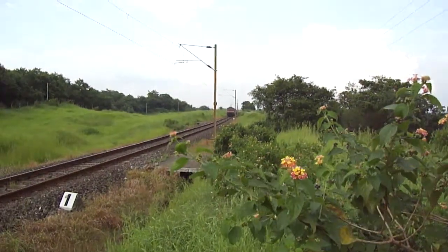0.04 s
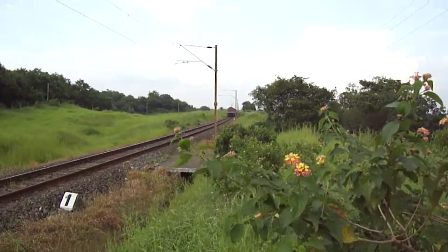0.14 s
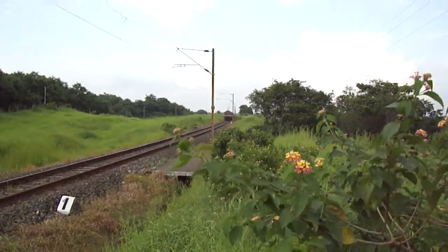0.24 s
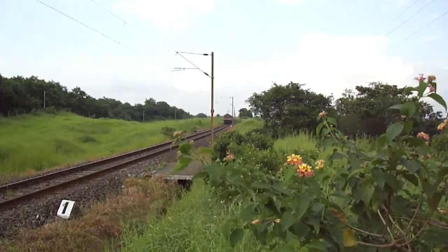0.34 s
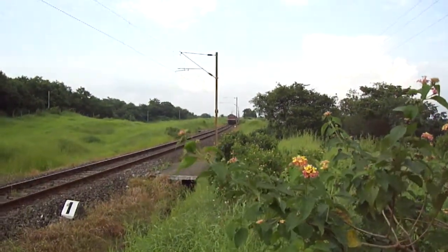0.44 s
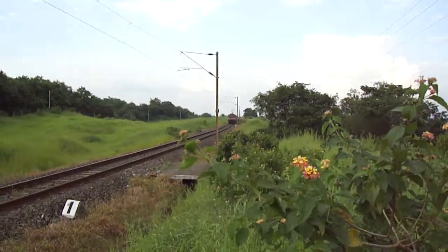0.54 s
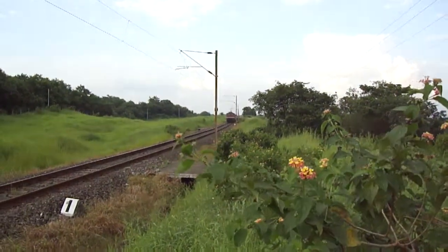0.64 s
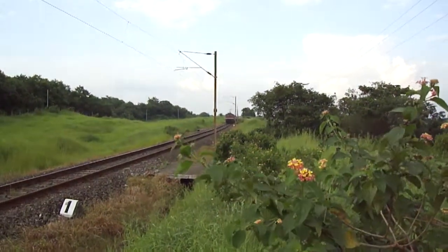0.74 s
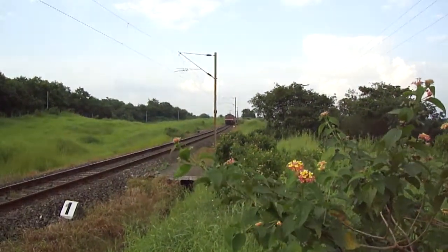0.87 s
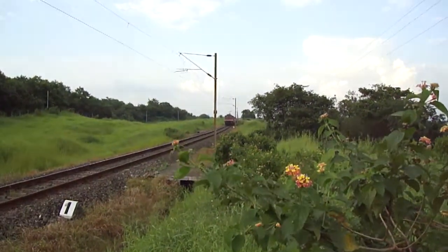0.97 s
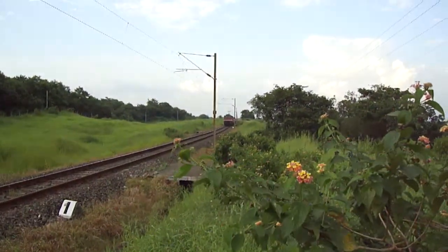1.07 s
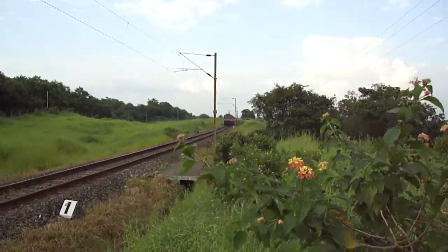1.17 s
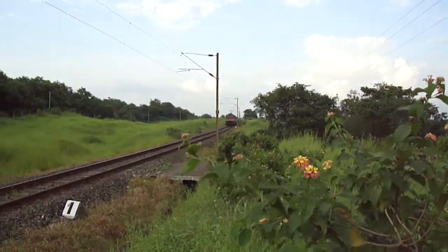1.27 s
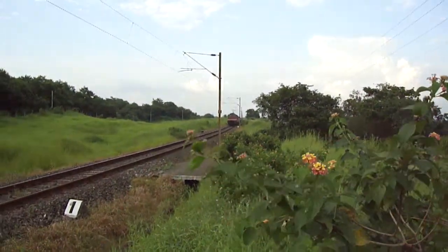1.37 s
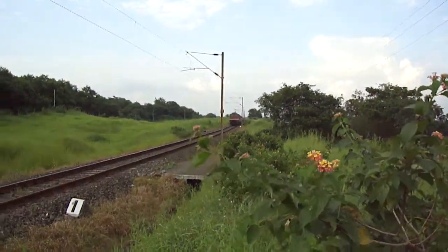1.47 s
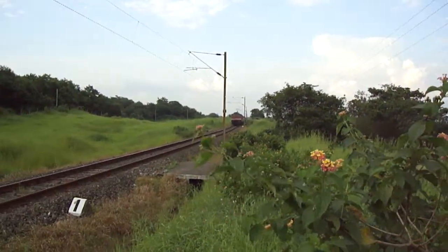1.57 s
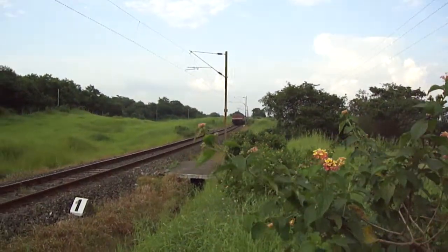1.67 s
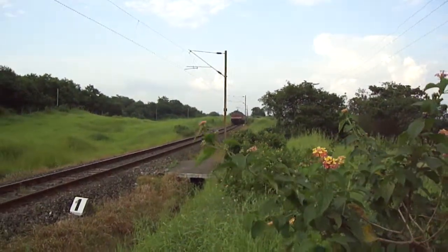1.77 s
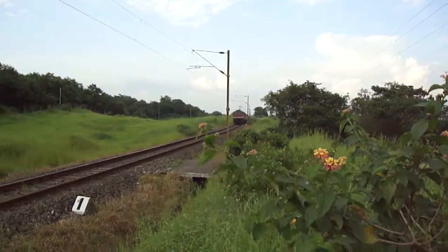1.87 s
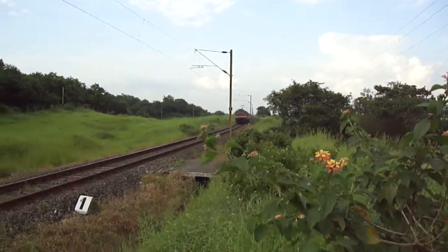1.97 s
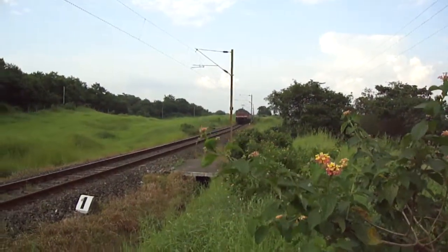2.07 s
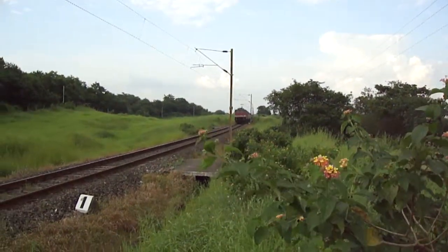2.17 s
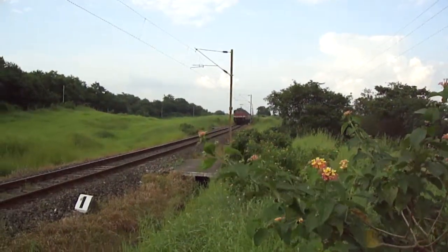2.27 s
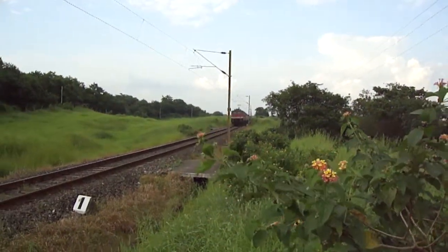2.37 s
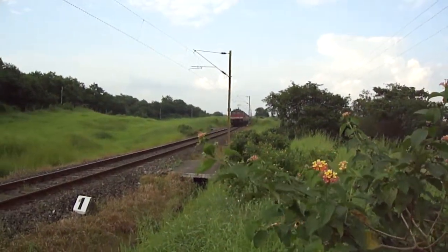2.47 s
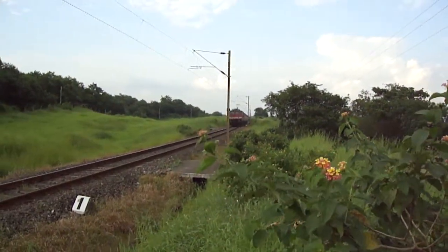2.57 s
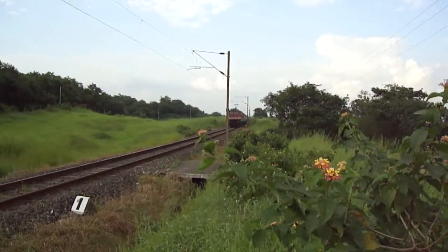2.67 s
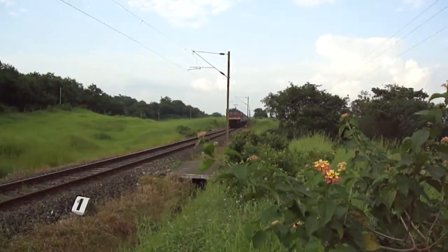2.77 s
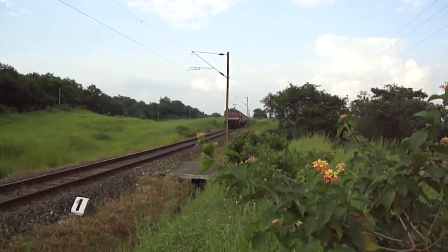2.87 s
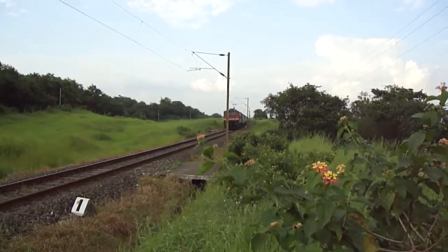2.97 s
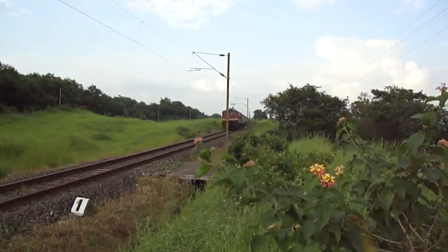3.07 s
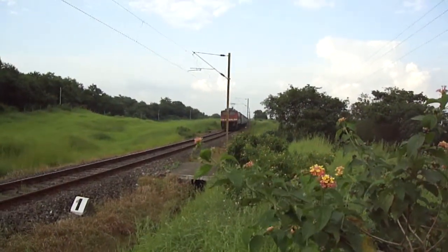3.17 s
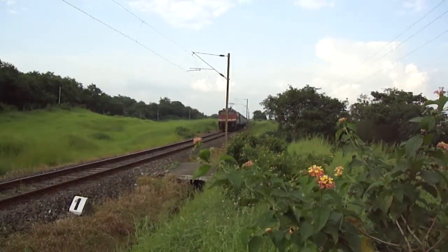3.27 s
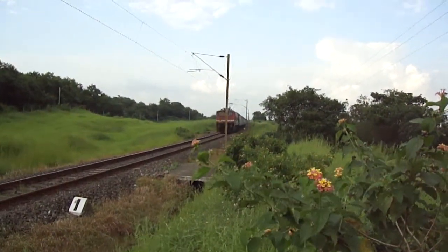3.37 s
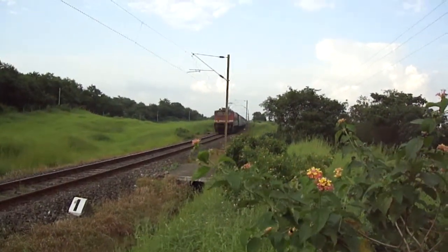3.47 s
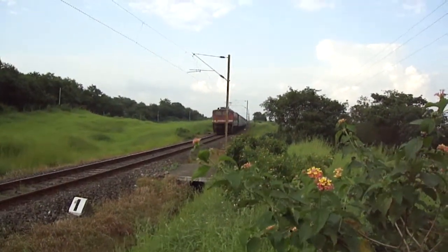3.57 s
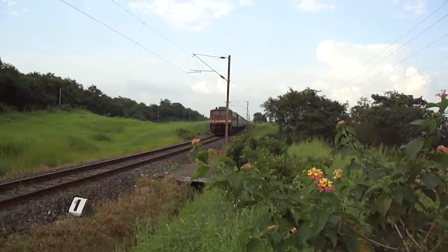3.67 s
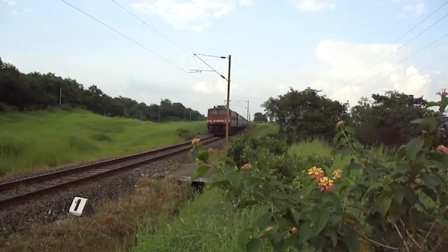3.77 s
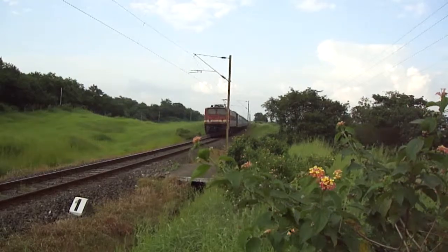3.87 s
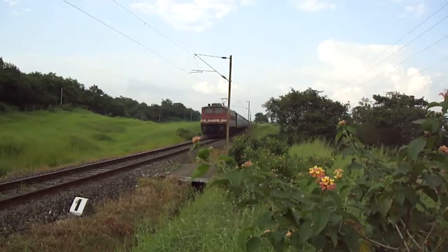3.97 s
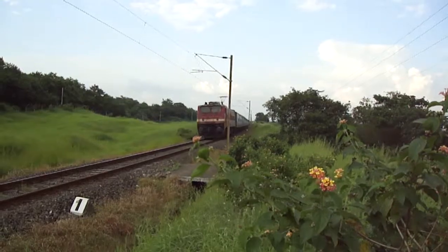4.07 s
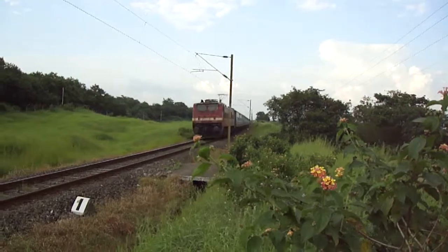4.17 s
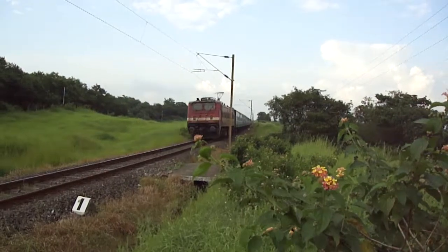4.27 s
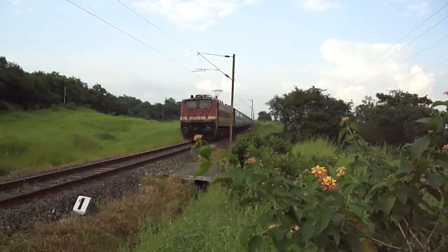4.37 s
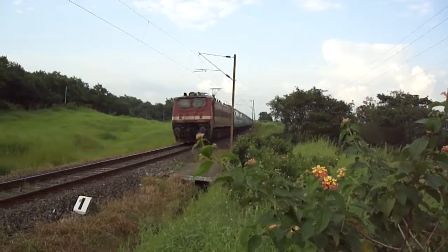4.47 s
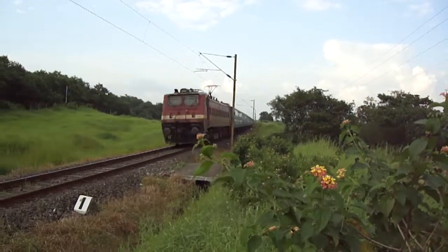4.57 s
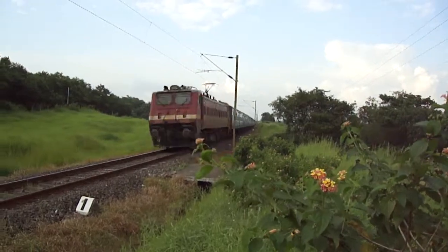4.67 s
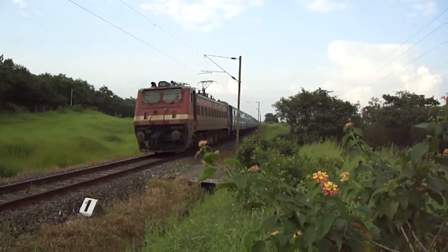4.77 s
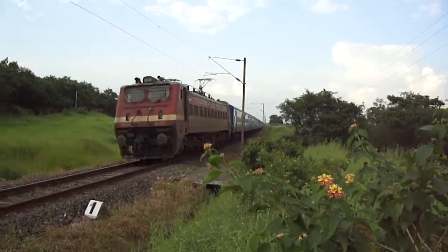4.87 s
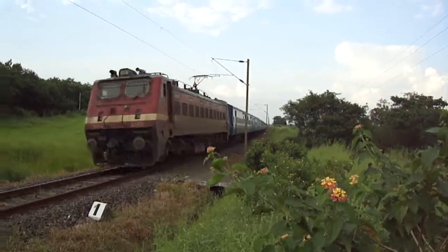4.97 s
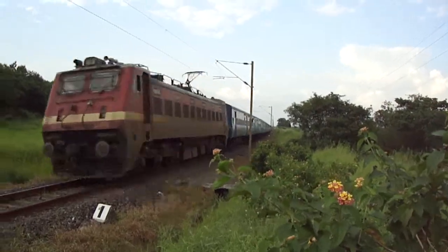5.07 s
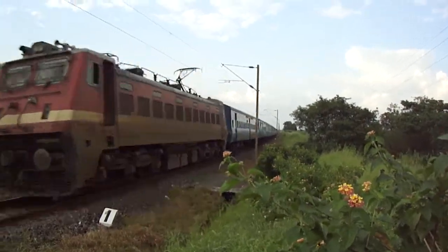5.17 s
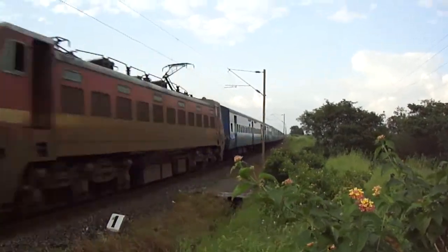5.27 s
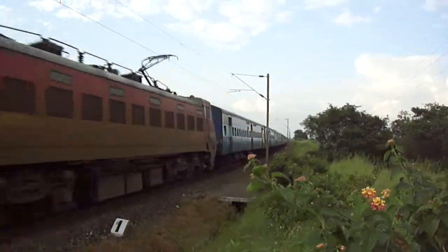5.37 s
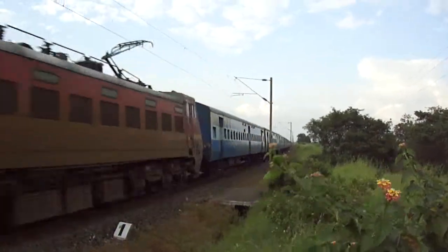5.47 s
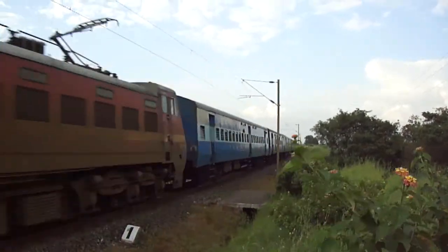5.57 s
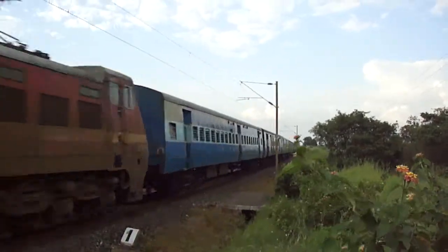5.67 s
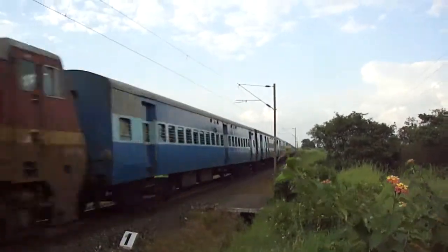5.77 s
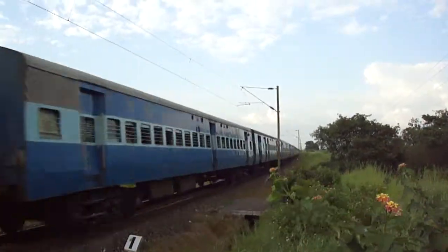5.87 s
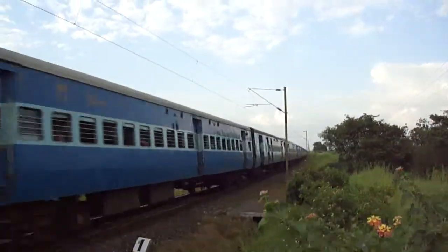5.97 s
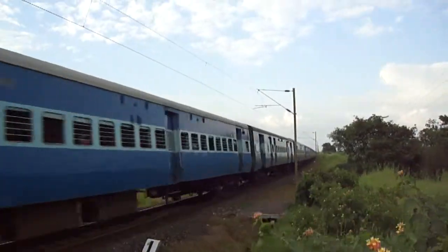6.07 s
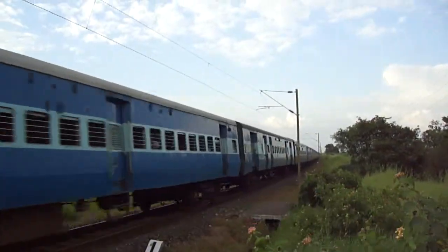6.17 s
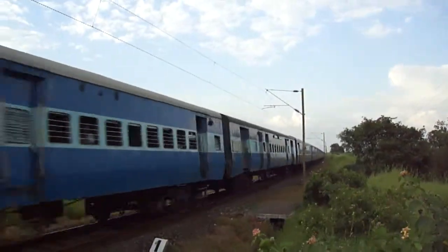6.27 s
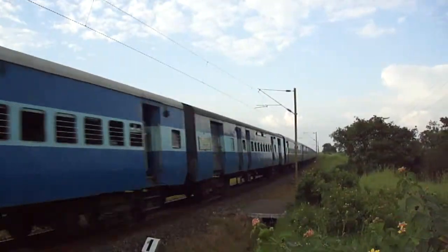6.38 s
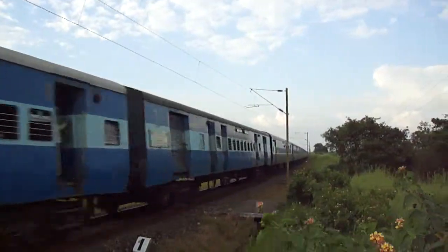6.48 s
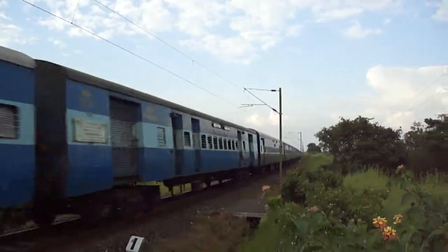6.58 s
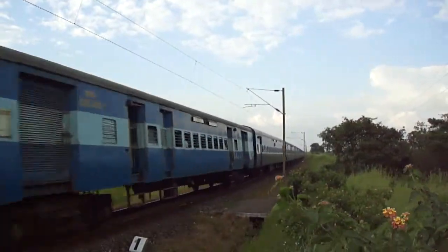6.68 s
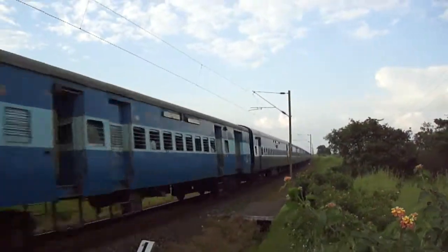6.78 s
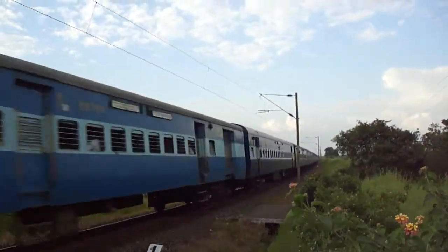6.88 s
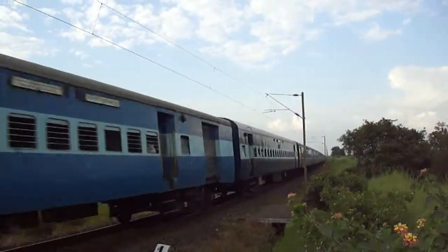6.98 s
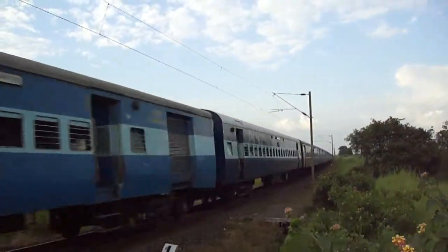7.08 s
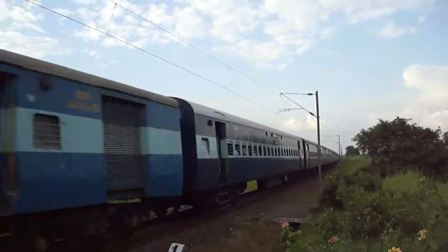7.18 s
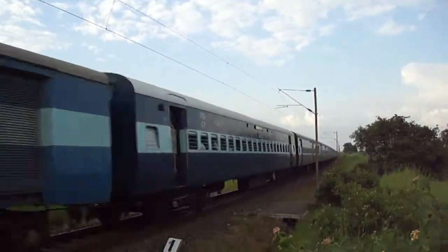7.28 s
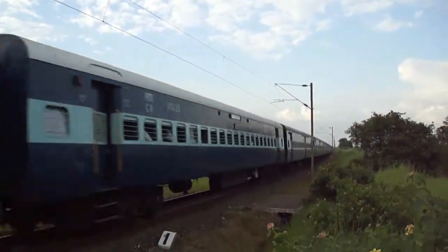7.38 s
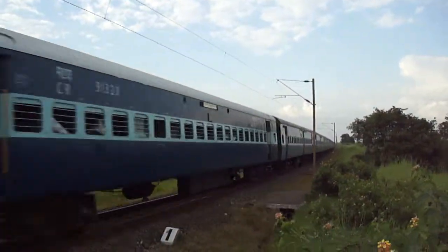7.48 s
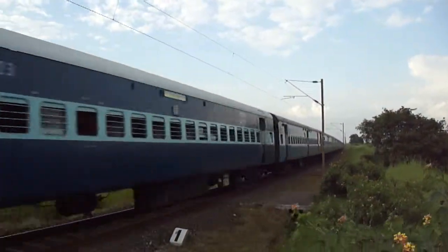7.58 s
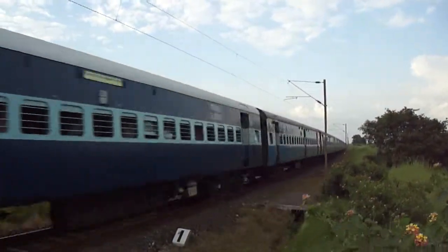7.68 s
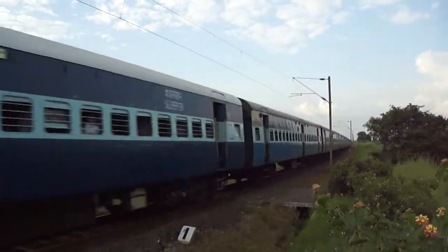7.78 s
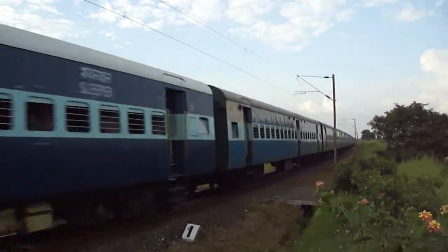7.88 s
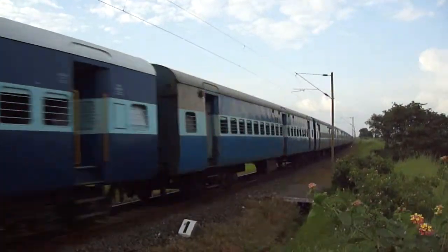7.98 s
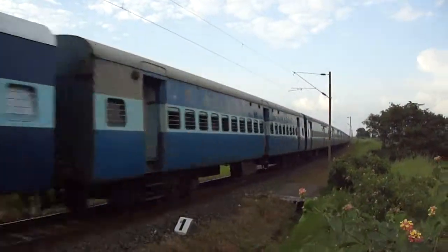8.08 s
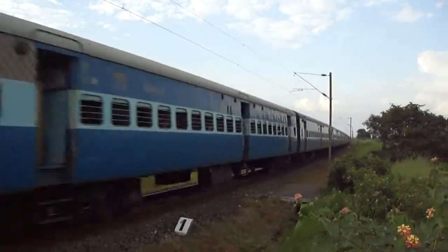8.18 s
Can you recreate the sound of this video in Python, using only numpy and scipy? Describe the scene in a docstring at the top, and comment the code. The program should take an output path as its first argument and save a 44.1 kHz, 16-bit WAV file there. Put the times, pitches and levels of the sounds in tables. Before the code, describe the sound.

A microphone stands close to the track in open grass. First come soft wind, thin insect buzz, quick bird whistles and a metallic rail song with a rising gear whine. Two short piercing horn blasts follow just before the locomotive arrives. It sweeps by with a roaring, ringing body and falling pitch, then coaches clatter past with uneven wheel knocks, steel cracks and small squeals.

```python
"""Grassland beside a railway track: an electric locomotive with coaches comes along and passes close by.
Rails, wheels and locomotive body are noise through resonances; the rolling roar is coloured noise in seven ranges.
Gears, the transformer, two horn blasts, squeals and a bird are gliding sines; rail joints are short noise bursts.
A bird and an insect, a throbbing narrow noise, are heard before the train arrives.
All other sound dips while the horn blows."""
import sys
import numpy as np
from scipy import signal
from scipy.fft import rfft, irfft, next_fast_len
from scipy.io import wavfile
from scipy.ndimage import uniform_filter1d

SR = 44100
rng = np.random.default_rng(int(sys.argv[2]) if len(sys.argv) > 2 else 0)


def put_to_file(sound):
    """Save the sound as 16-bit audio at rate SR, in the file named by the first command-line argument."""
    columns = np.atleast_2d(sound).T  # one column per channel
    safe = np.clip(columns, -1, 1)
    whole_steps = np.round(safe * 32767)
    wavfile.write(sys.argv[1], SR, whole_steps.astype(np.int16))


def gain_from_db(level_db):
    """Turn a decibel level (scalar or array-like) into a linear amplitude factor."""
    decades = np.asarray(level_db, float) / 20
    return 10 ** decades


N = 362943

ARRIVAL_S = 5.11   # the train comes alongside
# what a struck or rolling wheel rings with: pitch_hz, width_hz, relative level_db
WHEEL_RINGS = [(1577, 160, 0), (1975, 110, 0.5), (2496, 190, -7.5), (3250, 180, -11)]


def rms_one(x):
    """Scale to rms 1."""
    return x / np.sqrt(np.mean(x ** 2) + 1e-20)


def band_pass(x, order, range_hz):
    """Keep one range of pitches; rms 1."""
    return rms_one(signal.sosfilt(signal.butter(order, range_hz, "band", fs=SR, output="sos"), x))


def in_time(rows):
    """Sample range of a table and its columns joined by straight lines."""
    s, *columns = np.transpose(rows)
    at = np.arange(max(int(s[0] * SR), 0), min(int(s[-1] * SR), N))
    return [at] + [np.interp(at / SR, s, c) for c in columns]


def drift(rate_hz):
    """Slow random wandering, spread 1: smoothed noise made at every 40th sample."""
    r = np.exp(-80 * np.pi * rate_hz / SR)
    white = rng.standard_normal(N // 40 + 2002)
    slow = signal.lfilter([1], [1, -2 * r, r * r], white)[2000:]
    return np.interp(np.arange(N) / 40, np.arange(len(slow)), rms_one(slow))


def resonant_noise(hz, width_hz):
    """White noise twice through one resonance; rms 1."""
    r = np.exp(-np.pi * width_hz / SR)
    section = [1, 0, -1, 1, -2 * r * np.cos(2 * np.pi * hz / SR), r * r]
    return rms_one(signal.sosfilt([section, section], rng.standard_normal(N)))


def tone(hz, db):
    """A sine that follows pitch and rms level."""
    return np.sqrt(2) * gain_from_db(db) * np.sin(2 * np.pi * np.cumsum(hz) / SR)


def ringing(modes, level_db, flicker_db, flicker_hz):
    """Rough contact keeps each resonance ringing, each flickering by itself."""
    out = 0
    for hz, width_hz, db in modes:
        out = out + gain_from_db(db + flicker_db * drift(flicker_hz)) * resonant_noise(hz, width_hz)
    return gain_from_db(level_db) * out


def range_levels(bogies_db, wheels_db, treble_db, far):
    """Levels of the roar's seven ranges, lowest first; grass and distance weaken some from afar."""
    # lowest range, wind and ground, before its drift and dips: time_s, level_db
    wind = [(0, -54), (0.5, -55.5), (2.2, -53), (3, -45.5), (3.6, -51.5), (4.1, -42.5), (4.6, -51),
            (5.2, -46.5), (6.2, -56.5), (7.7, -56), (8.23, -56)]
    # upper middle range over the mean of wheels and treble: time_s, level_db
    rush = [(0, -1.5), (3.9, 0), (5.05, 0.5), (5.3, 1.5), (5.55, 2.5), (5.8, -1), (6.2, 1.5), (6.8, 1),
            (7.4, 2), (8.23, -1)]
    rumble_db, ground_loss_db = -4, 9.5   # against the bogie range; taken by the grass from afar
    air_db, air_loss_db = -8.5, 3   # top range against the treble; its loss from afar
    wind_db = np.resize(in_time(wind)[1], N) + 2.7 * drift(7.1)
    # the lowest range dips further under the horn, by 0.3 of the depth
    wind_db = wind_db + 0.3 * 20 * np.log10(dip())
    rumble = bogies_db + rumble_db - ground_loss_db * far
    upper_middle = (wheels_db + treble_db) / 2 + np.resize(in_time(rush)[1], N)
    air = treble_db + air_db - air_loss_db * far
    return [wind_db, rumble, bogies_db, wheels_db, upper_middle, treble_db, air]


def roar(levels_db, patchy_db):
    """Rolling noise of one colour; seven ranges swell at random, partly together, partly alone."""
    # spectrum of the rolling noise: pitch_hz, relative level_db per Hz
    colour = [(18, -72), (30, -49), (190, -23), (274, -14.5), (326, -9.5), (378, -12), (698, 2), (829, 3.5),
              (1030, -1), (1260, -1), (1390, -3), (1960, -3.5), (2220, -5.5), (4870, -11.5), (10700, -18),
              (13900, -23), (22000, -120)]
    # where each range has its level set: low_hz, high_hz
    ranges = [(40, 150), (190, 420), (520, 760), (1850, 2350), (3550, 4000), (6050, 6500), (8600, 9000)]
    size = next_fast_len(N)
    hz = np.arange(1, size // 2 + 2) * SR / size
    colour_hz, colour_db = np.transpose(colour)
    spectrum = rfft(rng.standard_normal(size)) * gain_from_db(np.interp(np.log(hz), np.log(colour_hz), colour_db))
    centres = np.log(np.sqrt(np.prod(ranges, axis=1)))
    together, out = drift(25.0), 0
    for k, (low, high) in enumerate(ranges):
        inside = (hz > low) & (hz < high)
        unit = np.sqrt(2 * np.sum(np.abs(spectrum[inside]) ** 2)) / size
        # neighbouring ranges blend into each other
        share = np.interp(np.log(hz), centres, np.arange(len(centres)) == k)
        level_db = levels_db[k] + patchy_db * (.5 * together + drift(33))
        out = out + irfft(spectrum * share, size)[:N] / unit * gain_from_db(level_db)
    return out


def wheels(wheels_db, coaches):
    """Wheel and bogie resonances ride on the roar; coach wheels ring all along once alongside."""
    # wheel and bogie resonances: pitch_hz, width_hz, level_db over the wheels' level
    modes = [(747, 58, -24), (1610, 190, -26), (2014, 65, -30), (2640, 120, -31), (3180, 400, -9.5),
             (4650, 130, -29), (5140, 280, -17)]
    riding = ringing(modes, wheels_db, flicker_db=2.0, flicker_hz=4.0)
    coach_wheels = ringing(WHEEL_RINGS, wheels_db - 8, flicker_db=3.5, flicker_hz=3.8)
    return riding + coaches * coach_wheels


def passing(x):
    """Reading slower once the source recedes lowers its pitch."""
    # passing lowers the rail song: time_s, pitch_ratio
    pitch_drop = [(0, 0.99), (5.3, 0.97), (5.8, 0.93), (6.3, .89), (8.23, 0.81)]
    at, ratio = in_time(pitch_drop)
    return np.interp(np.cumsum(np.resize(ratio, N)), np.arange(N), x)


def rail_song(rail_db, coaches):
    """Rails ring at their resonances; the song throbs once the coaches are alongside."""
    # rail resonances before passing lowers them: pitch_hz, width_hz, relative level_db
    modes = [(972, 60, -15.5), (1077, 70, -2), (1136, 44, -1.5), (1173.7, 52, 1.5), (1218, 49, -0.5),
             (1261.6, 46, -3.5), (1315, 48, -5.5), (1385, 34, -12.5), (3250, 200, -25.5),
             (3590, 210, -20.5)]
    song = passing(ringing(modes, -10.5, flicker_db=1.0, flicker_hz=31.0))
    return gain_from_db(rail_db + 3 * coaches * drift(20)) * song


def whine():
    """Gear teeth mesh steadily and the transformer hums; the lines tremble, and gear and motor tones fall in passing."""
    # gear whine while the train comes on, before trembling: time_s, pitch_hz, level_db
    front = [(0, 1106, -36), (1, 1106, -31), (2, 1105, -25.5), (2.6, 1105.5, -23), (3.95, 1105, -22.5),
             (4.6, 1104, -25), (5.1, 1095, -40)]
    # transformer hum, before trembling: time_s, pitch_hz, level_db
    hum = [(0, 500.6, -66), (1, 500.6, -57), (3.9, 500.6, -45), (4, 500.6, -65), (4.1, 500.6, -80)]
    # gear and motor tones as their bogie passes, before shift and swell:
    # pass_s, pitch_hz, level_db, fade_db_per_s away from pass_s, start_s, stop_s
    bogie_tones = [(5.66, 1078, -21.5, -4, 4.6, 4.8), (5.62, 1072, -30, 8, 5.06, 5.38),
                   (5.62, 1078, -22, 6, 5.37, 5.76), (5.62, 1078, -27, -8, 5.76, 5.95),
                   (6.01, 1078, -20.5, -20, 5.96, 6.5), (6.3, 1112, -25, -12, 6.5, 6.8),
                   (5.65, 231, -33.5, -44, 5.2, 6.25)]
    speed_m_s, distance_m = 27, 4.5
    out, tremble_hz, waver_db = np.zeros(N), 1.0 * drift(11.7), 0.9 * drift(8.0)
    for rows in [front, hum]:
        at, hz, db = in_time(rows)
        out[at] += tone(hz + tremble_hz[at], db + waver_db[at])
    swell_db, rough_hz = 3 * drift(25), 11.0 * drift(60)
    for pass_s, hz, db, fade_db_per_s, start, stop in bogie_tones:
        at = np.arange(int(start * SR), int(stop * SR))
        along_m = speed_m_s * (at / SR - pass_s)
        # Doppler shift, with sound at 343 m/s
        shift = 1 - speed_m_s / 343 * along_m / np.hypot(along_m, distance_m)
        level_db = db + fade_db_per_s * np.abs(at / SR - pass_s) + swell_db[at]
        edges = signal.windows.tukey(len(at), .06 * SR / len(at))
        out[at] += tone(hz * shift + rough_hz[at], level_db) * edges
    return out


def insect():
    """A thin high stridulation, narrow noise that comes in uneven throbs."""
    # before the throbs: time_s, level_db
    loudness = [(0, -71), (2, -68.5), (3.6, -60), (3.95, -60), (4, -102), (8.23, -103)]
    at, db = in_time(loudness)
    return np.resize(gain_from_db(db), N) * resonant_noise(hz=9500, width_hz=70) * gain_from_db(1.6 * drift(14))


def bird():
    """Whistled notes sliding down, strongest past the middle."""
    # falling notes, level before swelling and fading: start_s, length_s, start_hz, end_hz, level_db
    notes = [(.305, .025, 5800, 5150, -53.5), (.346, .022, 5700, 5100, -52.5),
             (.378, .035, 5750, 4900, -52), (.425, .035, 5800, 4780, -49.5), (.48, 0.059, 2800, 2740, -49),
             (.482, .046, 6230, 4900, -44), (0.55, 0.042, 6100, 4900, -43), (0.62, .044, 6000, 4940, -43.5),
             (1.757, 0.034, 5600, 4850, -49), (1.812, 0.036, 5750, 4950, -45),
             (1.877, .038, 5900, 4950, -42), (1.948, .038, 5800, 4900, -43), (2.958, .025, 5600, 5000, -48),
             (3.012, 0.028, 5600, 4600, -45), (3.066, 0.032, 5750, 4950, -40.5),
             (3.128, 0.036, 5850, 4950, -41), (3.198, .032, 5650, 5000, -42)]
    out = np.zeros(N)
    for s, length, start_hz, end_hz, db in notes:
        part = np.linspace(0, 1, int(length * SR))
        hz = end_hz + (start_hz - end_hz) * (1 - part) ** 1.3
        swell = np.abs(np.sin(np.pi * part ** 1.5)) ** 0.57
        out[int(s * SR):int(s * SR) + len(part)] += tone(hz, db) * swell
    return out


def squeals():
    """A wheel mode sings roughly for a moment; its pitch slides, mostly down, as the wheel goes by."""
    # flange squeals, before roughness and fades: start_s, length_s, start_hz, end_hz, level_db
    cries = [(3.6, .06, 3600, 3560, -42), (3.6, .05, 4600, 4560, -44), (3.73, .05, 3480, 3440, -41),
             (3.79, .04, 3300, 3280, -43), (4.548, .04, 3330, 3450, -33), (4.6, .07, 3500, 3480, -31),
             (4.69, .03, 3620, 3580, -33), (5.14, .05, 3350, 3480, -31), (5.23, .06, 3050, 3200, -33),
             (5.29, .04, 3320, 3300, -33), (5.3, .1, 2150, 2200, -33), (5.42, .05, 2070, 2040, -32),
             (5.45, .12, 2450, 2380, -35), (5.51, .08, 3100, 3030, -30), (5.6, .1, 3130, 2850, -36),
             (5.72, .04, 3700, 3680, -35), (5.89, .03, 3900, 3850, -34), (6.0, .15, 1960, 1860, -32),
             (5.74, .26, 1620, 1560, -31), (5.86, .12, 2080, 2010, -31), (6.44, .1, 1920, 1870, -31),
             (6.52, .05, 2700, 2680, -36), (6.58, .06, 3330, 3300, -37), (6.6, .13, 2550, 2480, -35),
             (6.77, .15, 2690, 2520, -31), (6.85, .07, 3380, 3330, -37), (6.86, .06, 1950, 1950, -33),
             (6.94, .17, 3200, 3050, -35), (7.08, .03, 4280, 4200, -33), (7.25, .07, 2080, 2000, -33),
             (7.35, .07, 2050, 1980, -32), (7.52, .06, 2050, 2000, -33), (7.51, .06, 3600, 3560, -36),
             (7.69, .05, 2480, 2450, -32), (7.76, .07, 1960, 1900, -34), (7.915, .035, 3270, 3230, -33),
             (8.02, .05, 2680, 2640, -36), (8.03, .07, 4440, 4400, -39), (8.03, .2, 5050, 4990, -38),
             (8.1, .08, 3980, 3930, -36)]
    out, stick_hz, stick_db = np.zeros(N), 28.0 * drift(120), 3.0 * drift(70)
    for s, length, start_hz, end_hz, db in cries:
        at = np.arange(int(s * SR), min(int((s + length) * SR), N))
        part = np.linspace(0, 1, len(at))
        hz = start_hz + (end_hz - start_hz) * part + stick_hz[at]
        out[at] += tone(hz, db + stick_db[at]) * np.sqrt(np.abs(np.sin(np.pi * part)))
    return out


def horn():
    """A reed horn: clean partials, each fluttering at random, the higher ones more; air hisses along."""
    # each blast, levels before offsets and flutter: time_s, pitch_hz, fundamental_db, second_db,
    # third_db, middle_db (fourth partial), upper_db (seventh partial)
    blasts = [
        [(3.958, 810.0, -37, -60, -60, -60, -60), (3.968, 827.6, -15, -40, -45, -42, -48),
         (3.98, 840.1, -20, -17, -26, -33, -39), (4.02, 840.4, -25, -17, -26, -33, -32),
         (4.1, 837.5, -28, -17, -25, -34, -33), (4.16, 837.4, -26, -21, -25, -27, -30),
         (4.19, 837.4, -34, -19, -24, -25, -31), (4.22, 837.5, -26, -17, -23, -23, -31),
         (4.27, 837.6, -31, -18, -25, -24, -35), (4.35, 837.6, -18, -16, -23, -32, -28),
         (4.4, 835.4, -14, -20, -23, -26, -37), (4.44, 833, -12, -21, -22, -30, -43),
         (4.46, 832.5, -14, -24, -27, -38, -46), (4.475, 832, -13, -26, -46, -48, -50),
         (4.5, 836, -25, -40, -52, -52, -52), (4.522, 824, -15, -44, -52, -55, -55),
         (4.54, 820, -36, -50, -55, -58, -58), (4.56, 815, -20, -55, -58, -58, -58),
         (4.575, 815, -33, -58, -60, -60, -60), (4.585, 815, -22, -60, -60, -60, -60),
         (4.6, 805, -34, -60, -60, -60, -60)],
        [(4.695, 815.0, -46, -60, -60, -60, -60), (4.712, 829, -17, -37, -43, -43, -59),
         (4.728, 832.9, -12, -25, -32, -35, -50), (4.77, 838.5, -15, -29, -24, -30, -38),
         (4.81, 836.6, -17, -23, -25, -35, -37), (4.85, 835.4, -19, -20, -29, -29, -41),
         (4.9, 834.5, -27, -17, -27, -32, -42), (4.93, 834.4, -17, -18, -24, -30, -42),
         (4.96, 833, -15, -26, -24, -24, -35), (4.98, 832, -14, -33, -25, -33, -46),
         (4.998, 832.4, -20, -23, -29, -38, -50), (5.016, 826, -9.5, -24, -31, -46, -60),
         (5.032, 826, -15, -29, -36, -52, -60), (5.058, 827, -27, -35, -50, -52, -60),
         (5.07, 815, -14, -45, -50, -52, -60), (5.09, 803, -28, -45, -52, -55, -60),
         (5.102, 804, -19, -45, -52, -55, -60), (5.116, 794, -24, -48, -55, -55, -60),
         (5.13, 790, -20, -50, -55, -55, -60), (5.145, 780.0, -38, -60, -60, -60, -60)],
    ]
    # high partials waver on their own: time_s, fifth_db, sixth_db, eighth_db, ninth_db, topmost_db
    high_blasts = [
        [(3.97, -46, -50, -41, -50, -54), (3.994, -41, -43, -48, -44, -61), (4.03, -42, -36, -54, -55, -51),
         (4.09, -43, -42, -58, -53, -57), (4.166, -38, -40, -58, -59, -52), (4.23, -36, -42, -56, -43, -50.5),
         (4.288, -35, -38, -60, -47, -44.5), (4.316, -36, -35, -56, -53, -54), (4.35, -39, -33, -51, -39, -43),
         (4.376, -43, -46, -51, -43, -43), (4.4, -38, -41, -49, -50, -51), (4.434, -46, -57, -35, -48, -48),
         (4.47, -55, -48, -41, -56, -57), (4.52, -49, -49, -46, -54, -52)],
        [(4.71, -49, -49, -47, -51, -51), (4.728, -49, -50, -45, -39, -51), (4.762, -43, -45, -56, -44, -49),
         (4.782, -45, -44, -53, -42, -51), (4.804, -36, -39, -51, -46, -51), (4.826, -35, -44, -55, -45, -53),
         (4.86, -48, -46, -49, -49, -52), (4.89, -38, -52, -53, -42, -52), (4.926, -40, -42, -46, -42, -48),
         (4.968, -39, -37, -49, -36, -42.5), (4.986, -54, -56, -53, -41, -54), (5.008, -48, -59, -46, -40, -52),
         (5.036, -56, -54, -52, -52, -55), (5.07, -39, -48, -51, -54, -49)],
    ]
    # partials 1-13: offset_db over the level column each follows
    offsets_db = [0.5, 0, 0, 0.5, 2, 2, 0.5, 4, 0.5, -4, 2, 0, -1.5]
    # partials 1-13: number of the level column each follows, those of both tables counted on from 0
    follows = [0, 1, 2, 3, 5, 6, 4, 7, 8, 9, 9, 9, 9]
    out = np.zeros(N)
    flutter_db = [(1.05 + 0.099 * k) * drift(31) for k in range(len(offsets_db))]
    escaping_air = band_pass(rng.standard_normal(N), 1, [3500, 7400])
    for rows, high in zip(blasts, high_blasts):
        at, hz, *levels_db = in_time(rows)
        s, *columns = np.transpose(high)
        levels_db += [np.interp(at / SR, s, c, left=-70, right=-70) for c in columns]
        blast = 0
        for k, db in enumerate(offsets_db):
            blast = blast + tone((k + 1) * hz, levels_db[follows[k]] + db + flutter_db[k][at])
        # the hiss follows the mean of the two lowest partials
        blast += gain_from_db((levels_db[0] + levels_db[1]) / 2 - 24.5) * escaping_air[at]
        out[at] += blast * signal.windows.tukey(len(at), .03)
    return out


def embankment(x):
    """Late copies off the embankment beat against the horn wherever its pitch is sliding."""
    # horn echoes: delay_s, level_db
    echoes = [(.037, -37), (0.063, -27), (.11, -36), (.17, -35)]
    return x + sum(gain_from_db(db) * np.roll(x, int(delay * SR)) for delay, db in echoes)


def dip():
    """Quick fall, hold and slower return of everything but the horn, as gain."""
    # one dip under each blast: start_s, return_start_s, back_s, depth_db
    dips = [(3.97, 4.323, 4.556, -17.5), (4.714, 4.907, 5.165, -18.5)]
    fall_s = 0.032
    t = np.arange(N) / SR
    return gain_from_db(sum(np.interp(t, [s, s + fall_s, ease, back], [0, db, db, 0]) for s, ease, back, db in dips))


def locomotive(wheels_db):
    """The locomotive's body and blowers: noise through flickering resonances."""
    # body and blowers: pitch_hz, width_hz, level_db over the wheels' level
    modes = [(601, 75, -4), (690, 63, -4), (829, 77, -10), (1400, 55, -4.5), (1568, 110, -4.5)]
    return ringing(modes, wheels_db, flicker_db=4.0, flicker_hz=8.5)


def glints(level_db):
    """Wheel modes flash up at random pitches for a few hundredths of a second, sinking slightly."""
    per_s, loudest_db, low_hz, high_hz = 60, -4, 550, 4500
    out = np.zeros(N + SR)
    count = int(per_s * (N / SR - ARRIVAL_S))
    for when, pitch, span, size in rng.random((count, 4)):
        start = int(ARRIVAL_S * SR + when * (N - ARRIVAL_S * SR))
        part = np.linspace(0, 1, int((0.031 + 0.07 * span) * SR))
        hz = low_hz * (high_hz / low_hz) ** pitch
        db = loudest_db - 6.9 * size - 11.0 * pitch   # higher ones are weaker
        out[start:start + len(part)] += tone(hz * (1 - 0.016 * part), db) * np.sin(np.pi * part)
    return gain_from_db(level_db) * out[:N]


def joints():
    """Each axle drop shakes the bogie in a short dull burst, with a brighter crack of steel."""
    # wheels over joints, levels before each burst's rise and fall:
    # start_s, thump_db, crack_db, thump_hz, length_s
    blows = [(6.461, -19, -42, 720, 0.079), (6.508, -27, -35, 730, 0.016), (6.583, -20.5, -42, 695, 0.032),
             (6.636, -19, -39, 800, 0.024), (6.655, -18, -49, 824, 0.06), (6.764, -20, -32, 710, 0.024),
             (6.776, -15.5, -26, 700, 0.037), (6.804, -17, -31, 794, 0.04), (6.886, -34, -32, 799, 0.022),
             (6.98, -26, -29, 800, 0.022), (7.047, -23.5, -42, 800, 0.067), (7.144, -16.5, -34, 835, 0.028),
             (7.162, -20.5, -28, 770, 0.057), (7.27, -24, -23, 686, 0.17), (7.343, -30.5, -38, 810, 0.03),
             (7.369, -13, -36, 814, 0.015), (7.387, -16.5, -48, 690, 0.029), (7.088, -40, -34, 800, .02),
             (7.446, -49, -25, 802, .02), (7.534, -22.5, -29, 865, 0.06), (7.592, -21.5, -37, 783, 0.052),
             (7.767, -22, -42, 980, 0.034), (7.791, -23.5, -46, 870, 0.1), (7.914, -25, -39, 830, 0.018),
             (7.991, -19, -38, 654, 0.017), (8.002, -30, -44, 750, 0.019), (8.088, -30, -45, 810, 0.027),
             (8.127, -38, -26, 797, 0.028), (8.22, -25, -26, 743, 0.031)]
    boom_db, knock_db = -11, -13   # coach floor's boom and the wheel's knock, against the thump
    out = np.zeros(N)
    bright = band_pass(rng.standard_normal(N), 2, [1800, 9000])
    white = rng.standard_normal(N)
    knock = rms_one(ringing(WHEEL_RINGS, 0, flicker_db=3.0, flicker_hz=19.0))
    boom = band_pass(white, 2, [297, 514])
    rattle = gain_from_db(4 * drift(90))   # loose parts roughen the knock
    for s, thump_db, crack_db, hz, length in blows:
        at = np.arange(int(s * SR), min(int((s + 2 * length) * SR), N))
        age = (at / SR - s) / length
        dull = band_pass(white[at], 2, [0.77 * hz, 1.32 * hz])
        # evening out the envelope makes one solid blow, not a flicker
        envelope = uniform_filter1d(np.abs(signal.hilbert(dull)), size=120)
        dull = rms_one(dull / (0.75 + envelope))
        thump = dull + gain_from_db(boom_db) * boom[at] + gain_from_db(knock_db) * knock[at] * rattle[at]
        out[at] += gain_from_db(thump_db) * thump * np.sin(np.pi * np.clip(age / 1.02, 0, 1) ** 0.66)
        # the crack is over in 0.02 s
        out[at] += gain_from_db(crack_db) * bright[at] * np.sin(np.pi * np.clip(age * length / 0.02, 0, 1))
    return out


def scene():
    """All sources at one microphone."""
    # the train as it nears and passes, levels before offsets and flicker:
    # time_s, bogie_range_db, wheel_range_db, treble_db, rail_song_db
    rolling = [(0, -48.5, -51, -62.5, -26), (0.9, -47, -50, -62.5, -23), (1.45, -44.5, -44.5, -55.5, -21.5),
               (2.36, -41, -45.5, -55.5, -20), (2.96, -35.5, -43, -54.5, -19), (3.55, -34, -40, -50.5, -17),
               (3.95, -29.5, -36.5, -47, -15.5), (4.65, -29.5, -33.5, -44.5, -18),
               (5.25, -29, -30, -41, -16), (5.66, -30.5, -29, -44.5, -20), (5.9, -27, -28.5, -44, -19),
               (6.3, -29, -35, -46.5, -21), (6.6, -31, -33, -43.5, -25.5), (6.9, -31, -33, -41, -31),
               (7.3, -30.5, -32.5, -39, -28), (7.6, -32, -30, -43, -24), (7.85, -33.5, -35.5, -48, -25.5),
               (8.05, -29.5, -32.5, -39.5, -25), (8.23, -29.5, -30.5, -36, -27.5)]
    at, bogies_db, wheels_db, treble_db, rail_db = [np.resize(c, N) for c in in_time(rolling)]
    # far goes from 1 to 0 as the train arrives, coaches from 0 to 1 as they come alongside
    far = .5 - .5 * np.tanh((np.arange(N) / SR - ARRIVAL_S) / 0.24)
    coaches = np.clip((at / SR - 6.16) / 0.33, 0, 1)
    train = roar(range_levels(bogies_db, wheels_db, treble_db, far), patchy_db=1.0)
    train += wheels(wheels_db, coaches) + rail_song(rail_db, coaches) + whine()
    train += (1 - far) * (1 - coaches) * locomotive(wheels_db)
    train += squeals() + glints(wheels_db) + joints()
    rest = train + insect() + bird()
    return (dip() * rest + embankment(horn()))[None]


def top_cut(x):
    """Nothing passes above the cut-off."""
    return signal.sosfilt(signal.butter(12, 10930, fs=SR, output="sos"), x)


def record(dry):
    """The finished mix is the scene as it stands."""
    return top_cut(dry)


dry = scene()
out = record(dry)
put_to_file(out)
```